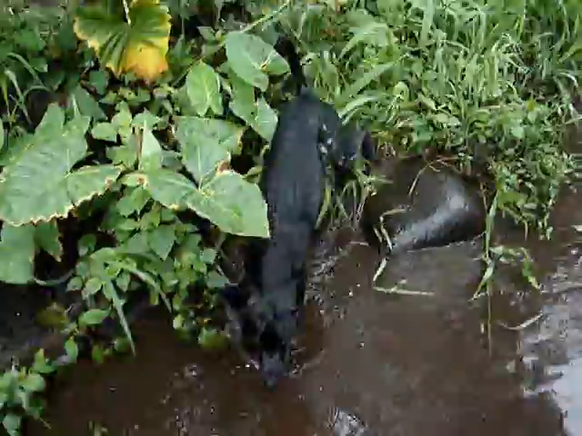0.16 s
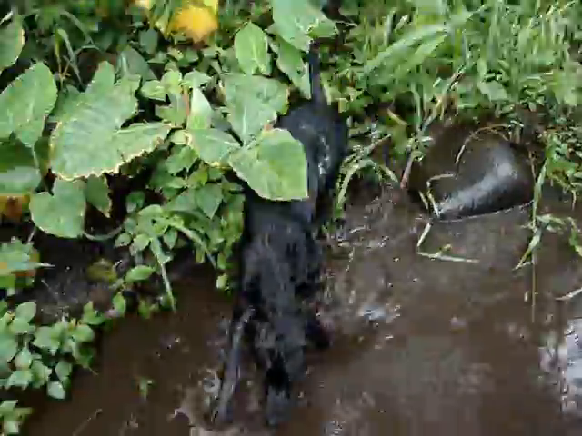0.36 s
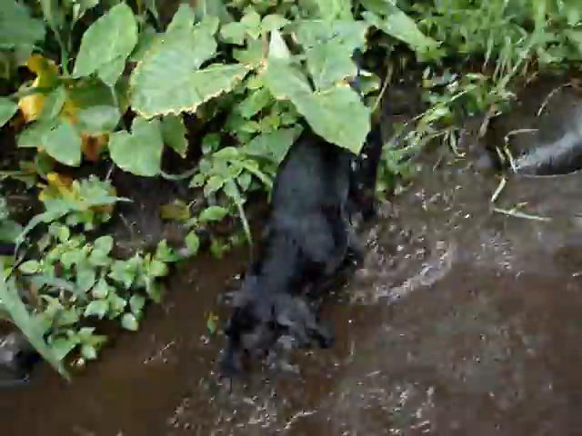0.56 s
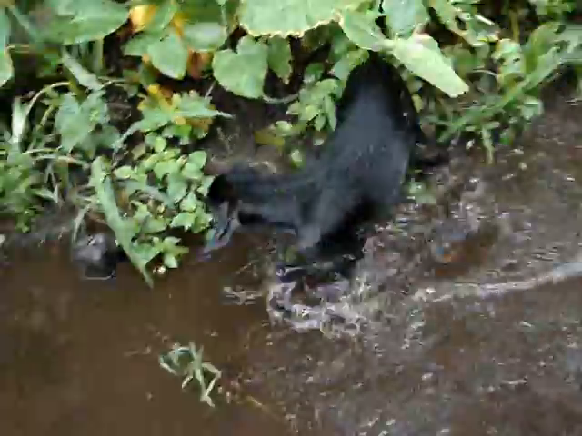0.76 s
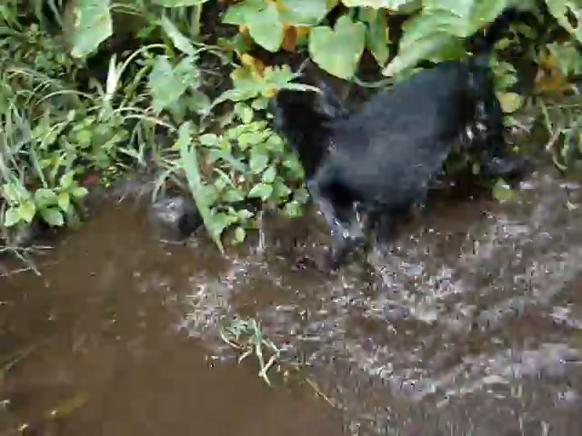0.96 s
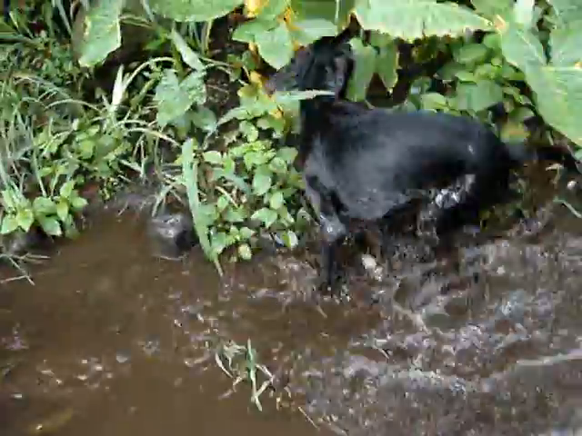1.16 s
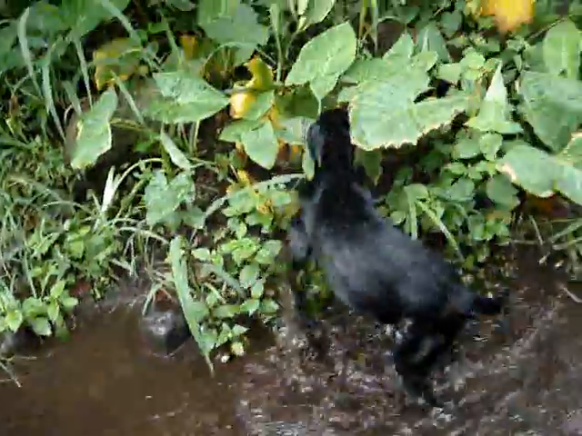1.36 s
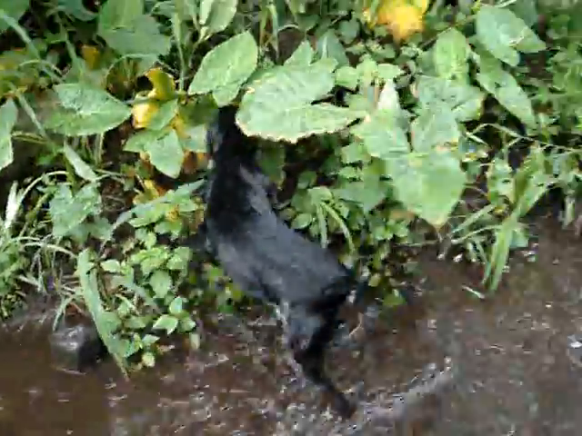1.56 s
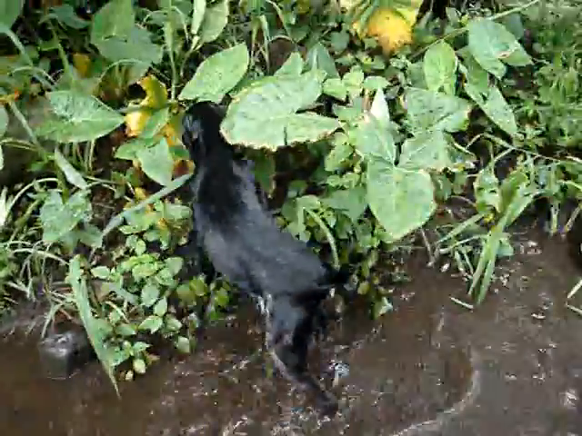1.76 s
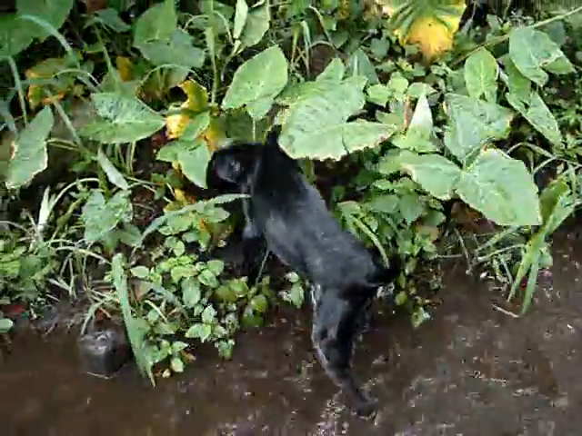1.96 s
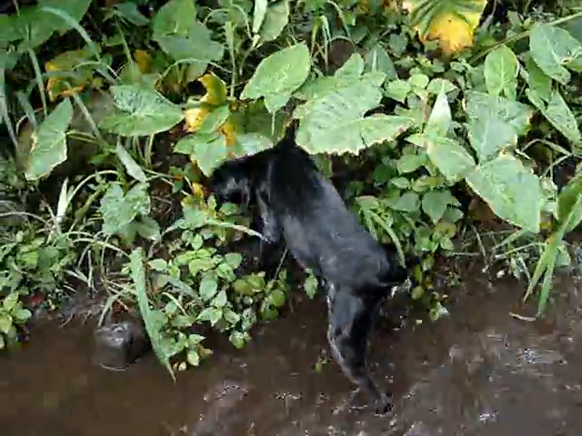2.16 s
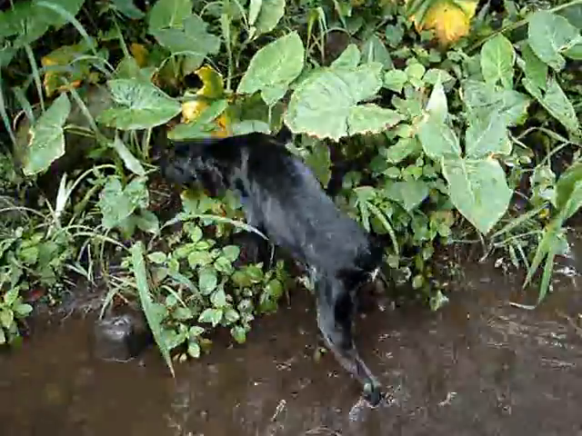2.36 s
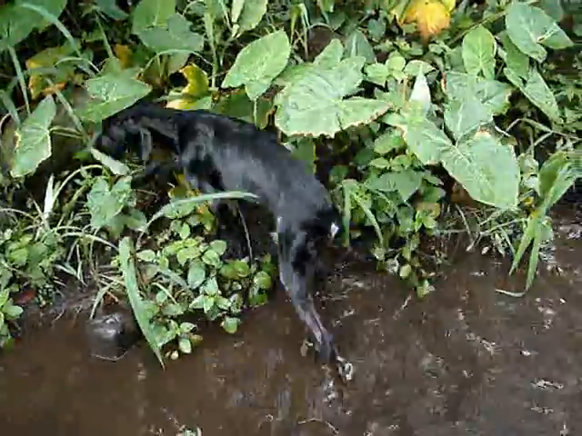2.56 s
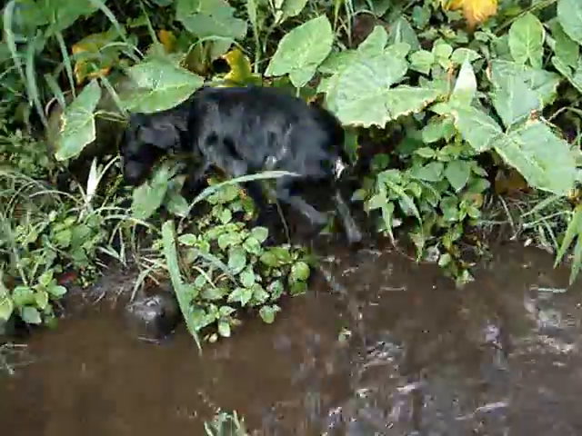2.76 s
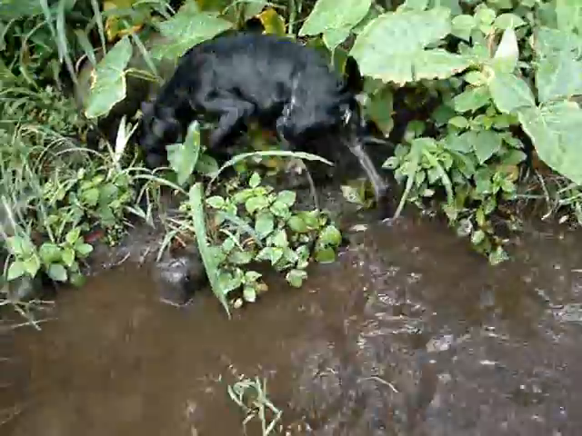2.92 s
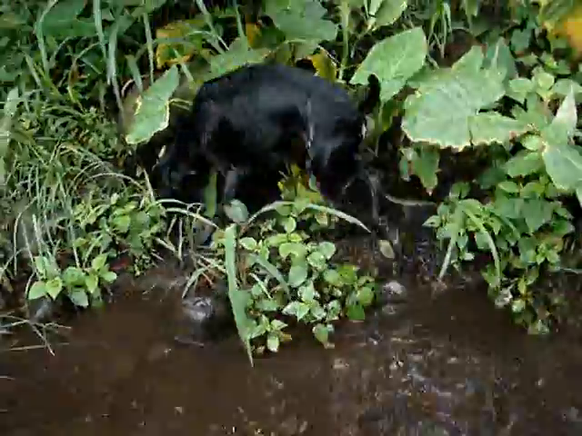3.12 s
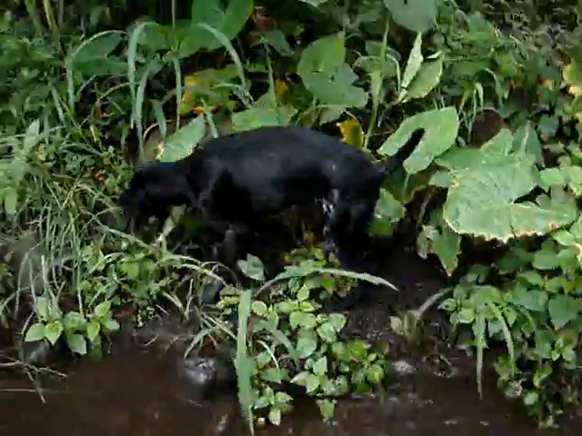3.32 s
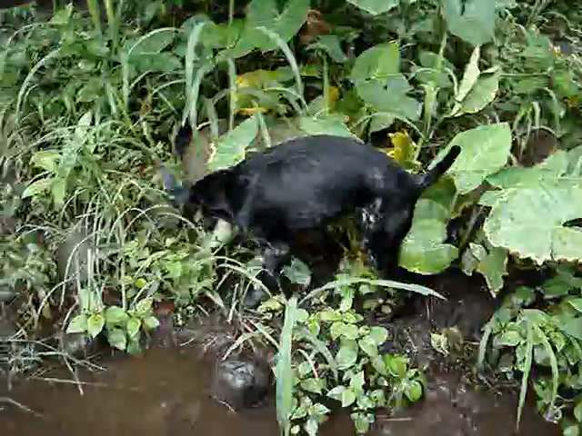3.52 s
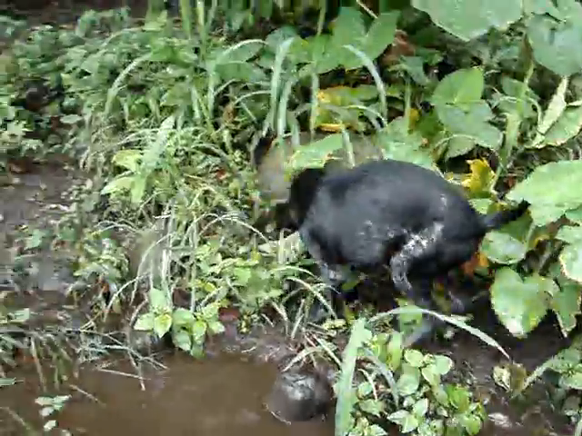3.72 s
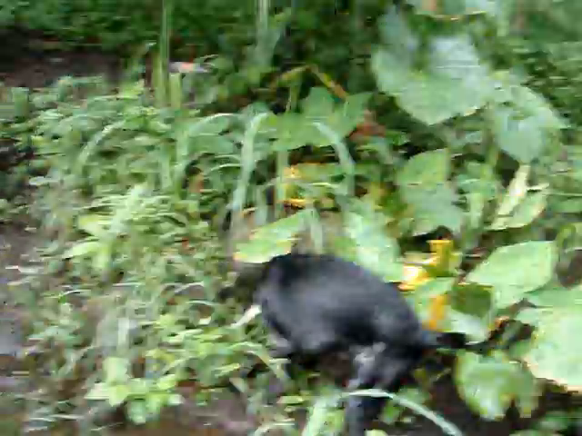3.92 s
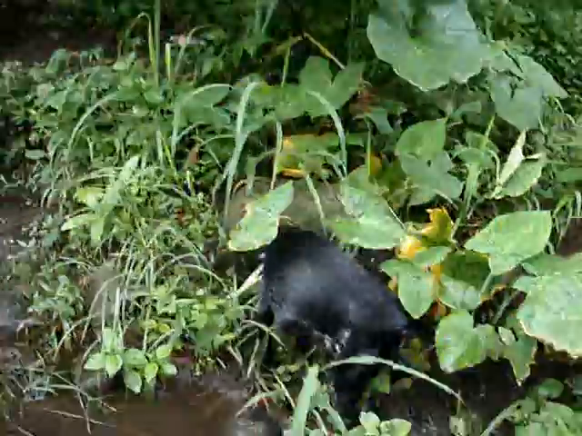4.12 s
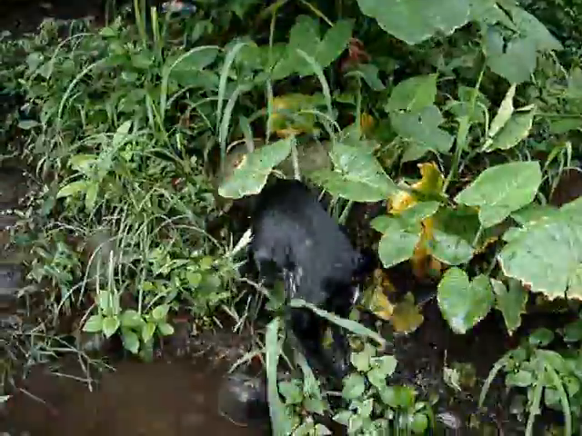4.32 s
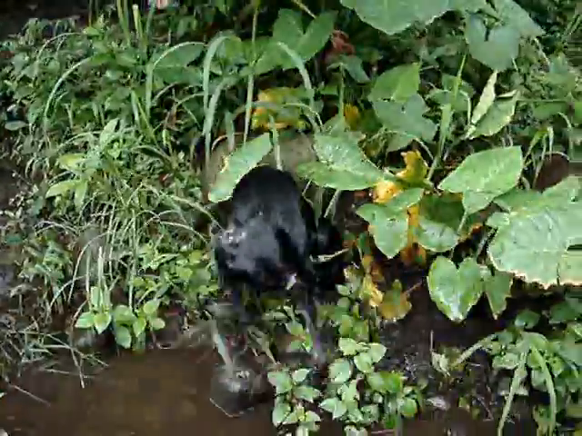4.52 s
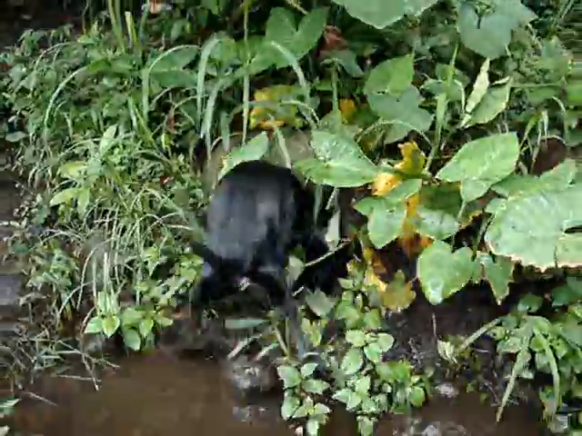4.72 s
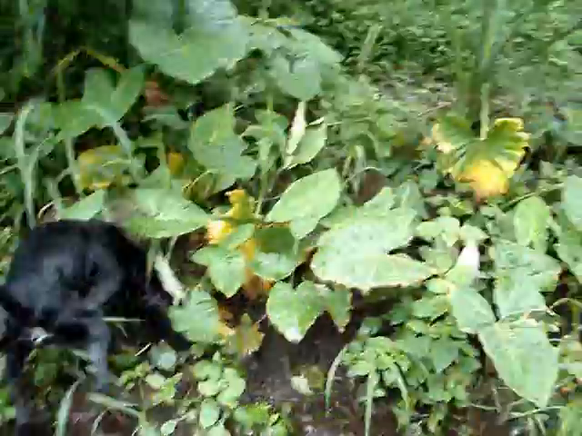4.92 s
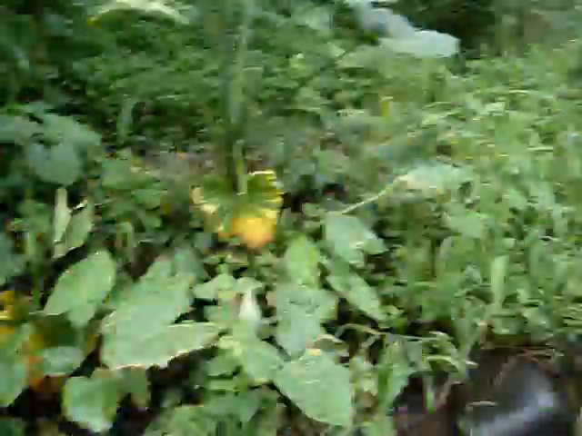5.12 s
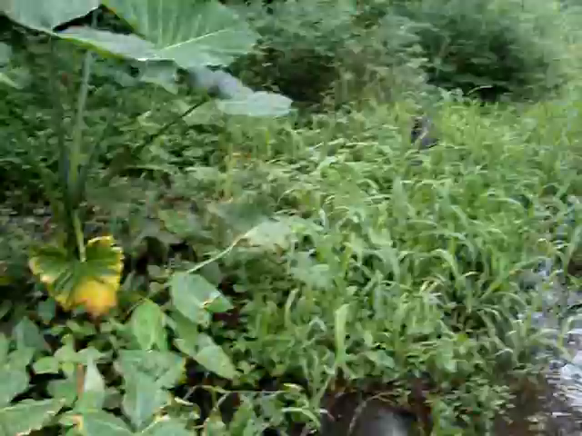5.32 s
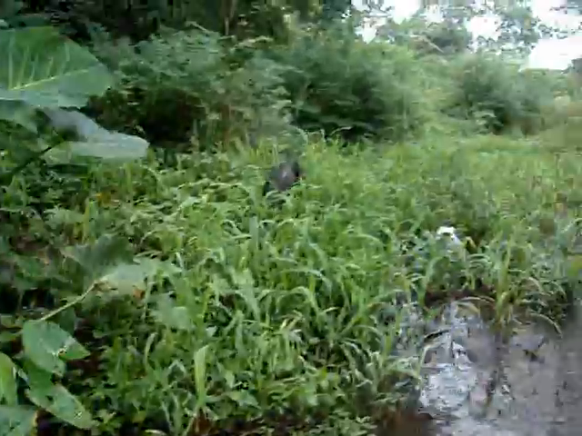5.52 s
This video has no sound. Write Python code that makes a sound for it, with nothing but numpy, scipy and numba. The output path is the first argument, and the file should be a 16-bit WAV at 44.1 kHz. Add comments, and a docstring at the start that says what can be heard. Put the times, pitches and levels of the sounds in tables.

```python
"""A shallow stream rushes steadily outdoors, heard from its bank: a wash of countless bubbles.
For the first two seconds a young dog wades through it: paws slap up spray, trapped air rings,
stirred water fizzes and drops plink back. Then the water settles and the dog climbs the muddy
bank, brushing through wet leaves and squelching around the three-second mark.
A few last leaves and drips tick while the stream runs on."""
import sys
import numpy as np
from scipy import signal
from scipy.fft import rfft, irfft, next_fast_len
from scipy.io import wavfile
from scipy.ndimage import uniform_filter1d
from numba import njit

SR = 44100
rng = np.random.default_rng(int(sys.argv[2]) if len(sys.argv) > 2 else 0)


def master(y):
    """Save y as 16-bit WAV."""
    cut = np.clip(np.atleast_2d(y).T, -1, 1)
    pcm = np.round(cut * 32767)  # scale
    wavfile.write(sys.argv[1], SR, pcm.astype(np.int16))


N = 250399
T = np.arange(N) / SR

# Paws hitting water. Each row: start in seconds, level in dB, length in seconds,
# low gulp against the spray in dB, ring of the spray in Hz, top of the spray in Hz.
PAW_SPLASHES = [(0.326, -22, 0.01, -5, 3700, 11000), (0.342, -22.5, 0.019, 2.5, 3400, 5500),
                (0.435, -28, 0.01, 1, 3530, 14000), (0.543, -20, 0.006, -8, 4000, 14000),
                (0.552, -29, 0.0079, -10, 5200, 14000), (0.5794, -18.5, 0.0095, -17, 4200, 6500),
                (0.684, -22.5, 0.01, -14, 3020, 14000), (0.786, -25.5, 0.015, -3, 6740, 16000),
                (0.978, -20.5, 0.009, -14, 4660, 12000), (0.995, -20.5, 0.007, -11, 3600, 6500),
                (1.031, -27, .008, -5, 3500, 9000), (1.114, -26, 0.01, 8, 3480, 9000),
                (1.133, -21, .004, 5, 3700, 12000), (1.14, -24.5, 0.0096, 0, 4500, 7000),
                (1.167, -20, 0.011, -3, 3700, 5000), (1.188, -29, 0.0071, 6, 4700, 7000),
                (1.2755, -16, 0.0115, -5, 4200, 10000), (1.372, -22, 0.0082, 5, 3900, 14000),
                (1.406, -27, .012, 7, 4000, 8000), (1.423, -27, 0.024, 7, 3500, 7000),
                (1.453, -19, 0.005, -8, 3900, 5000), (1.471, -19, 0.0097, -12, 3700, 12000),
                (1.508, -26, .01, -14, 4800, 14000), (1.626, -28, 0.0055, -20, 3600, 14000)]
# The loudest air pockets trapped by paws and falling drops.
# Each row: start in seconds, level in dB, pitch in Hz, cycles until it has died away.
AIR_POCKETS = [(0.210, -16, 1580, 50), (0.326, -17, 555, 46), (.345, -9, 3730, 35), (0.352, -16, 1100, 36),
               (.401, -21, 1520, 40), (.5398, -12.5, 884, 33), (.562, -20, 1120, 28), (.582, -11, 4070, 45),
               (.690, -20, 2670, 42), (0.712, -19, 1460, 50), (.762, -19.5, 690, 30), (.786, -19, 1640, 45),
               (.812, -14.5, 1230, 40), (0.8251, -4, 3150, 28), (.831, -15, 1620, 35),
               (.839, -19, 3250, 40), (0.892, -17, 2580, 58), (.943, -16, 3520, 40), (.955, -17, 2500, 45),
               (.984, -14, 4310, 50), (0.996, -15.5, 1080, 26), (0.9974, -9, 2800, 41),
               (1.019, -13, 4530, 35), (1.0206, -18, 3220, 54), (1.166, -12, 1033, 43),
               (1.206, -15, 1000, 20), (1.2055, -7.5, 2050, 19), (1.2056, -4.5, 3200, 25),
               (1.215, -15, 2800, 30), (1.232, -4, 2380, 19), (1.236, -18, 2300, 45),
               (1.3475, -10.5, 3800, 42), (1.406, -16, 1550, 45), (1.426, -18, 1260, 41),
               (1.441, -14, 2040, 45), (1.442, -17, 1110, 35), (1.4643, -5.5, 3800, 36),
               (1.466, -16.5, 400, 15), (1.467, -18.5, 850, 30), (1.4855, -13, 3750, 35),
               (1.493, -17, 1480, 50), (1.532, -12, 3500, 43), (1.627, -20, 3100, 55),
               (1.629, -17.5, 4000, 55), (1.812, -19.5, 3300, 46), (2.1446, -11, 2170, 15),
               (2.5205, -20, 4900, 50), (2.7225, -17, 3960, 45), (2.738, -16, 3190, 40),
               (3.0135, -15.5, 1900, 22), (3.154, -18, 890, 40), (3.197, -14, 2000, 40),
               (3.241, -17, 1590, 37), (3.336, -19, 780, 28), (3.376, -15, 380, 9.2), (3.39, -18, 486, 43),
               (3.429, -17, 443, 24), (4.041, -21, 2410, 30), (4.042, -19, 3520, 25),
               (4.9173, -16, 3930, 57), (5.266, -22, 6290, 64)]
# Leaves and stems struck on the bank.
# Each row: start in seconds, level in dB, length in seconds, centre of the ring in Hz.
LEAF_HITS = [(2.451, -33, .006, 4200), (2.464, -23, .003, 1900), (2.519, -26.5, 0.0065, 3400),
             (2.565, -35, 0.028, 5200), (2.72, -29, .0027, 3760), (2.7273, -17.5, 0.0035, 1840),
             (2.728, -28, .004, 3600), (2.737, -24, 0.003, 2500), (2.741, -31, .02, 2000),
             (2.984, -25, .0038, 6160), (3.0105, -21.5, 0.01, 1740), (3.04, -26, .007, 1600),
             (3.078, -23, 0.008, 1500), (3.079, -29, .007, 3600), (3.192, -23.5, 0.04, 1470),
             (3.199, -24, 0.005, 4330), (3.212, -30, .006, 4400), (3.261, -26.5, 0.016, 3240),
             (3.365, -28, .007, 3370), (3.37, -23, 0.0087, 1650), (3.454, -26, .016, 1770),
             (3.963, -28, .003, 3500), (4.011, -27, 0.0022, 3000), (4.017, -28.5, 0.025, 1970),
             (4.038, -25, 0.0049, 2600), (4.852, -36, 0.034, 3650), (5.264, -31, 0.004, 6000)]
# Paws pressing into mud. Each row: start in seconds, level in dB, length in seconds.
MUD_STEPS = [(3.014, -21.5, 0.017), (3.153, -27.5, 0.031), (3.374, -22.5, 0.02), (3.399, -25, 0.035),
             (3.435, -23.5, 0.028)]
# The stream as the listener turns. Each row: time in seconds, level before the trim in dB,
# treble tilt in dB per octave, babble against the rush in dB.
STREAM_RIDE = [(1.7, -28.5, 0, -10), (2.12, -29, -0.5, -13), (2.97, -28.5, 0, -16), (3.24, -27.5, 0, -8),
               (4.17, -30.5, 0, -19), (4.84, -30.5, 0, -16), (5.22, -28.5, 0.5, -7.5),
               (5.68, -29.5, 0.5, -23)]

# EQ curves that voice the noise layers. Each row: frequency in Hz, relative level in dB.
SPRAY_EQ = [(60, -60.5), (200, -37), (800, 3), (1800, -16), (3000, 3.5), (4500, 2), (6500, -1), (9000, -11),
            (12000, -16.5), (15500, -12)]  # bright spray off a paw
GULP_EQ = [(60, -45), (150, -26), (300, 3), (450, -8), (1000, 7.5), (1600, 11), (3000, -10), (8000, -22)]  # the hollow cavity closing behind it
FOAM_EQ = [(50, -55), (150, -41), (340, 1.5), (950, -8), (1550, 7), (2200, -3), (3900, 2.5), (6000, -4.5),
           (9000, -9.5), (12000, -21.5), (15500, -10)]  # fizz of stirred water
LEAF_CRACK_EQ = [(300, -9), (2000, -1), (4500, -1), (7000, -3), (11500, -14), (13500, -7), (15500, -7)]  # broad snap of a struck leaf
MUD_EQ = [(60, -30), (170, -33), (330, 0.5), (500, 2), (900, 3.5), (1300, -5), (3000, -17), (8000, -23),
          (12000, -33)]  # dull, soft ground
RUSH_EQ = [(30, -28), (60, -23.5), (120, -21), (220, -9), (320, -3), (450, 0), (950, 0.8), (1200, -2.5),
           (1800, -3), (3900, -11.5), (6200, -16.5), (10500, -28), (12100, -32), (13300, -27),
           (15500, -27.5)]  # midrange wash of far bubbles


def splashes(spatter_db=-12.5, spatter_stretch=1.2):
    """A paw throws up ringing spray that spatters back; its cavity closes with a low gulp."""
    spray = unit(colour(crackle(1200, 1.4), SPRAY_EQ))
    beads = bubbles(5000, 1380, 8800, cycles=19, spread_db=1.2)
    drops = bubbles(3500, 2800, 7700, cycles=7, spread_db=2.6)
    gulp = unit(colour(crackle(500, 1.5), GULP_EQ))
    mist = undb(-20) * unit(low_cut(crackle(1200, 2.5), hz=12000))  # the finest droplets
    out = 0
    for start, db, length, gulp_db, ring_hz, top_hz in PAW_SPLASHES:
        ringing = unit(band(beads, ring_hz, q=5.5))
        wet = unit(high_cut(undb(-3) * spray + undb(-4.5) * ringing, top_hz))
        slap = burst(wet + mist + undb(gulp_db) * gulp, start, length, attack_s=0.0008)
        spatter = undb(spatter_db) * burst(drops, start, length * spatter_stretch)
        out += undb(db) * (slap + spatter)
    return out


def plops(shed_db=-15.5, shed_octaves=0.385, glide=0.1):
    """Air pockets ring and shed fainter bubbles; small, loud ones come from fast drops that tick."""
    starts, db, hz, cycles = np.array(AIR_POCKETS).T.copy()
    pockets = ring(starts, hz, cycles, undb(db), glide)
    # each pocket sheds two bubbles, a little late and a little off its pitch
    for lag, detune in rng.random((len(starts), 2, 2)).transpose(1, 2, 0):
        shed_starts = starts + 0.0017 + 0.008 * lag
        shed_hz = hz * 2 ** (shed_octaves * (2 * detune - 1))
        pockets += ring(shed_starts, shed_hz, cycles, undb(db + shed_db), glide)
    tick = band(rng.standard_normal(N), 4300, q=0.67)
    tick_gains = undb(1.1 * db - 22) * hz / 3000
    ticks = sum(gain * burst(tick, start, 0.002, attack_s=0.00019)
                for start, gain in zip(starts, tick_gains))
    return low_cut(pockets) + ticks


def churn():
    """Water stirred by the legs fizzes, sloshes, sheds small bubbles and patters with droplets."""
    foam = undb(-2) * unit(colour(crackle(450, 4.6), FOAM_EQ))
    slosh = undb(-11.5) * bubbles(600, 447, 1170, cycles=27, spread_db=1.9)
    beads = undb(-6.5) * bubbles(1200, 837, 1870, cycles=29, spread_db=1.3)
    patter = undb(-2.5) * bubbles(2200, 2425, 5200, cycles=35, spread_db=2.2)
    return stirring() * (foam + slosh + beads + patter)


def stirring(wading_db=-34, climb_out_s=1.5, settle_s=0.089):
    """The churn's envelope: steady wading until the dog climbs out, plus a wake for each splash."""
    wake_db, rise_s, fall_s = -13.5, 0.0042, 0.08
    wading = undb(wading_db) * np.exp(-np.maximum(T - climb_out_s, 0) / settle_s)
    power = wading ** 2
    mean_length = np.mean([length for _, _, length, *_ in PAW_SPLASHES])
    for start, db, length, gulp_db, *_ in PAW_SPLASHES:
        swell = np.exp(-np.maximum((start - T) / rise_s, (T - start) / fall_s))
        heft = length / mean_length * (1 + undb(gulp_db) ** 2)  # long, deep splashes stir more
        power += heft * (undb(db + wake_db) * swell) ** 2
    return np.sqrt(power)


def leaves():
    """Wet leaves and stems crack against the dog and ring briefly."""
    grain = crackle(1400, 3.4)
    crack = undb(-16) * unit(colour(grain, LEAF_CRACK_EQ))
    out = 0
    for start, db, length, hz in LEAF_HITS:
        blade = band(band(grain, hz, q=0.85), hz, q=0.85)
        stem = undb(3) * band(blade, hz, q=3.5)
        out += undb(db) * burst(unit(blade + stem) + crack, start, length, attack_s=length / 8)
    return low_cut(out)


def mud():
    """Soft ground gives way under a paw with a dull, lumpy squelch and a few low bubbles."""
    lumps = colour(crackle(230, 2.2), MUD_EQ)
    ooze = lumps + undb(-13) * bubbles(500, 380, 930, cycles=24, spread_db=1.6)
    return sum(undb(db) * burst(ooze, start, length, attack_s=0.0054) for start, db, length in MUD_STEPS)


def thump(hz=78):
    """One faint low thump among the splashes."""
    rumble = band(band(rng.standard_normal(N), hz, q=0.66), hz, q=0.71)
    return undb(-38) * burst(rumble, start_s=1.231, length_s=0.0088)


def stream(trim_db=0.15, eddy_db=0.62):
    """Countless far bubbles merge into a rush; nearer ones gurgle, babble and tick out of it."""
    times, *columns = np.transpose(STREAM_RIDE)
    level_db, tilt_db, babble_db = (np.interp(T, times, column) for column in columns)
    spectrum = rfft(unit(colour(crackle(700, 0.92), RUSH_EQ)))
    hz = np.maximum(np.fft.rfftfreq(N, 1 / SR), 1)
    octaves = np.clip(np.log2(hz / 1000), -3, 4)
    rush = 0
    for octave in range(-3, 5):
        share = np.maximum(1 - abs(octaves - octave), 0)
        # every size of bubble comes and goes with its own eddies
        rush += irfft(spectrum * share, N) * undb(tilt_db * octave + eddy_db * wander(28))
    gurgle = undb(-15) * bubbles(900, 304.3, 1890, cycles=30.5, spread_db=3.5)
    babble = undb(babble_db) * bubbles(1100, 585, 1017, cycles=22, spread_db=3.2)
    ticks = undb(-28.5) * bubbles(2600, 1220, 5700, cycles=30, spread_db=5.9)
    return undb(level_db + trim_db) * (rush + gurgle + babble + ticks)


def bank_echo(x, taps=SR // 20):
    """In open air only the water surface and the bank return a faint early echo."""
    response = rng.standard_normal(taps) * envelope(0.001, 0.0088, attack_s=0.00098)[:taps]
    echo = signal.fftconvolve(x, response)[:N]
    return undb(-19) * np.std(x) * unit(echo)


def bubbles(count, low_hz, high_hz, cycles, spread_db):
    """A swarm of bubbles scattered over the whole scene: many faint ones, a few loud."""
    when, pitch, life, strength = rng.random((count, 4)).T
    hz = low_hz * (high_hz / low_hz) ** pitch
    gains = undb(spread_db * np.minimum(-np.log(1 - strength), 4))
    swarm = ring(when * N / SR, hz, cycles * (0.5 + life), gains, glide=0.31)
    return unit(low_cut(swarm))


@njit
def ring(starts_s, hz, cycles, gains, glide, pinch_cycles=0.52):
    """Bubbles swing up as they pinch off, then fade, rising by the share `glide` near the surface."""
    out = np.zeros(N)
    for k in range(len(starts_s)):
        first = int(starts_s[k] * SR)
        samples = int(cycles[k] * SR / hz[k]) + 2
        for i in range(min(samples, N - first)):
            age, turns = i / samples, hz[k] * i / SR
            level = gains[k] * min(turns / pinch_cycles, 1.) * np.exp(-6.9 * age)  # 60 dB of decay
            out[first + i] += level * np.sin(2 * np.pi * turns * (1 + glide * age / 2))
    return out


def crackle(rate_hz, rough_db):
    """Grainy noise: tiny bursts crowded together, each of its own strength."""
    return unit(rng.standard_normal(N) * undb(rough_db * wander(rate_hz)))


def wander(rate_hz):
    """A smooth random control at rms 1."""
    hold = int(SR / rate_hz)
    steps = np.repeat(rng.standard_normal(N // hold + 1), hold)[:N]
    return unit(uniform_filter1d(steps, hold))


def burst(texture, start_s, length_s, attack_s=0.0017):
    """One hit cut from a texture, its energy set by the envelope alone."""
    shape = envelope(start_s, length_s, attack_s)
    return unit(texture * shape) * np.sqrt(np.mean(shape ** 2))


def envelope(start_s, length_s, attack_s):
    """A quick attack, a short hold and a trailing fall."""
    age = np.maximum(T[:int((start_s + 8 * length_s) * SR)] - start_s, 0)
    shape = (1 - np.exp(-age / attack_s)) / (1 + (age / length_s) ** 2.86)
    return np.pad(shape, (0, N - len(shape)))


def colour(x, eq):
    """Minimum-phase EQ that keeps the power of white noise."""
    hz, db = np.transpose(eq)
    size = next_fast_len(N + SR // 4, True) // 2 * 2
    bin_hz = np.arange(size // 2 + 1) * SR / size
    gain = unit(undb(np.interp(np.log(bin_hz + 1), np.log(hz), db)))
    cepstrum = irfft(np.log(gain))
    cepstrum[1:size // 2] *= 2  # folded forward in time, so nothing pre-rings
    cepstrum[size // 2 + 1:] = 0
    return irfft(rfft(x, size) * np.exp(rfft(cepstrum)))[:N]


def band(x, hz, q):
    """One broad resonance."""
    return signal.lfilter(*signal.iirpeak(hz, q, fs=SR), x)


def low_cut(x, hz=280):
    """Small sources radiate almost no bass, so it rolls off steeply."""
    return signal.sosfilt(signal.butter(3, hz, "high", fs=SR, output="sos"), x)


def high_cut(x, hz):
    """Gentle roll-off of the treble."""
    return signal.sosfilt(signal.butter(2, hz, fs=SR, output="sos"), x)


def undb(db):
    """Decibels to gain."""
    return 10 ** (np.asarray(db) / 20)


def unit(x):
    """Scale to rms 1."""
    return x / np.sqrt(np.mean(x ** 2) + 1e-18)


def scene():
    """The mono mix: the dog and its echo up front, the stream as the bed."""
    dog = churn() + splashes() + plops() + leaves() + mud()
    return (dog + bank_echo(dog) + stream() + thump())[None]


def record(dry):
    """The sound snaps in after a moment of silence, with the very top cut steeply."""
    open_s, fade_s, top_hz = 0.092, 0.002, 15900
    fade_in = np.clip((T - open_s) / fade_s, 0, 1)
    return signal.sosfilt(signal.ellip(10, 0.2, 75, top_hz, fs=SR, output="sos"), dry * fade_in)


dry = scene()
out = record(dry)
master(out)
```